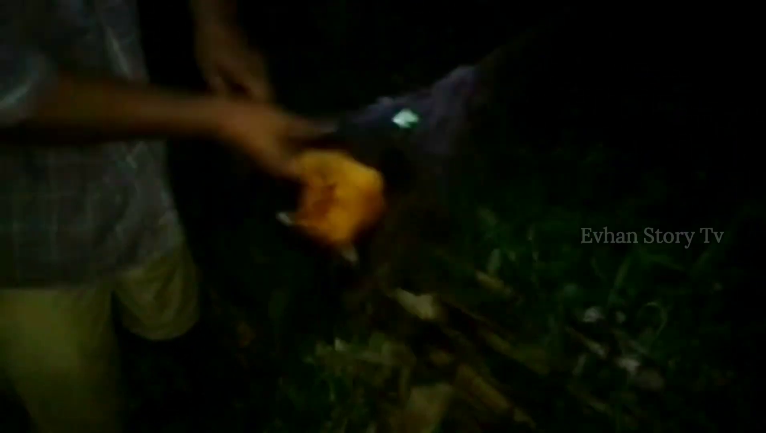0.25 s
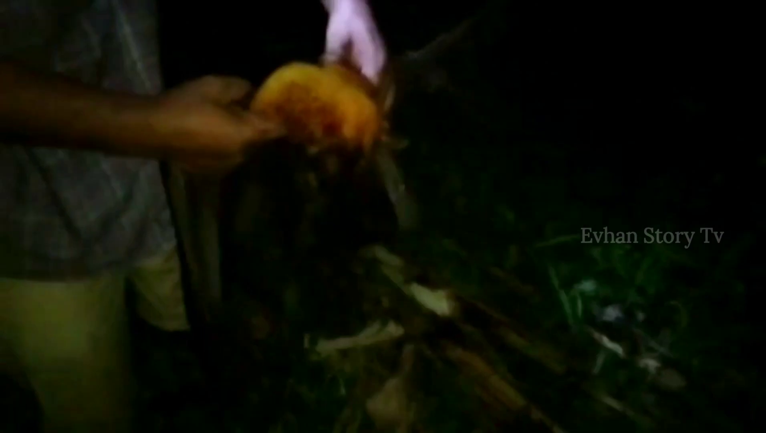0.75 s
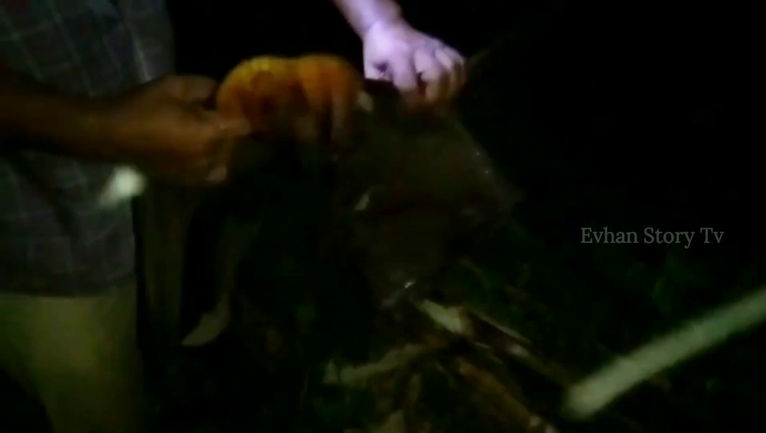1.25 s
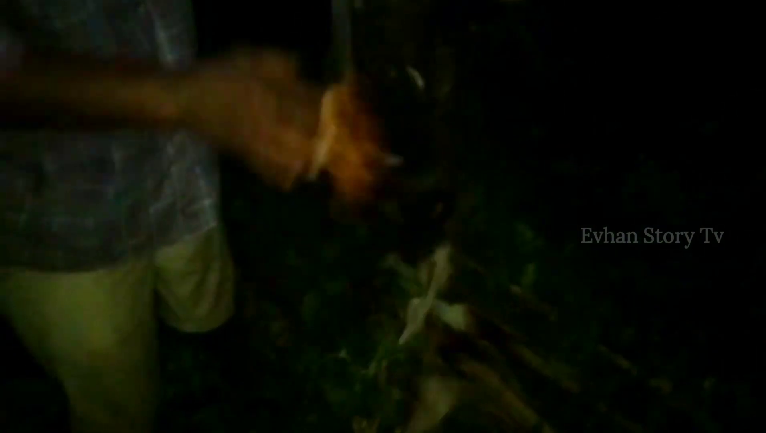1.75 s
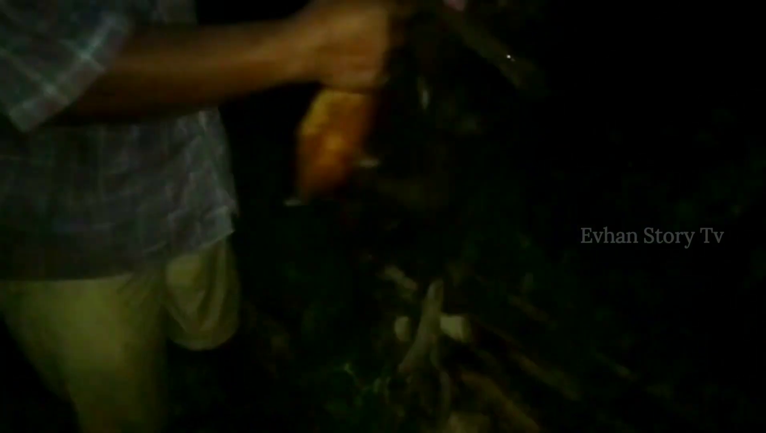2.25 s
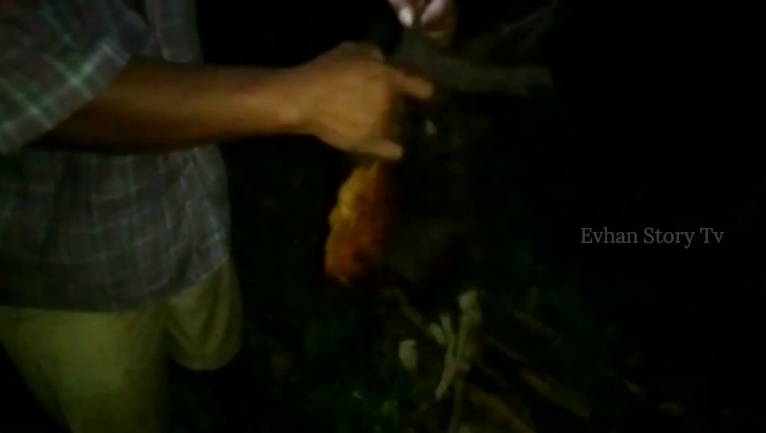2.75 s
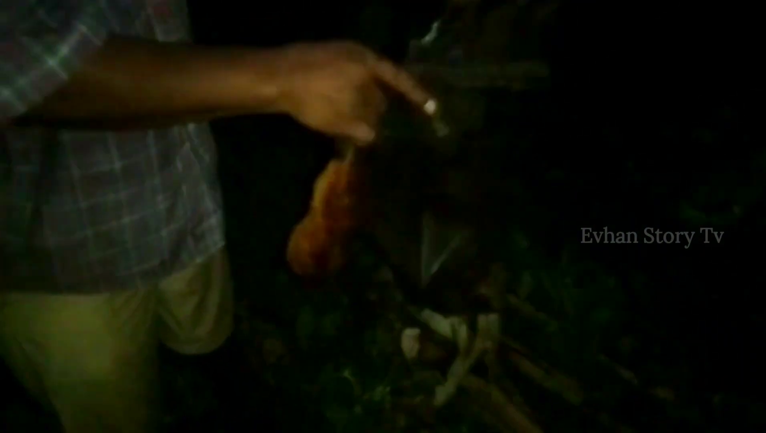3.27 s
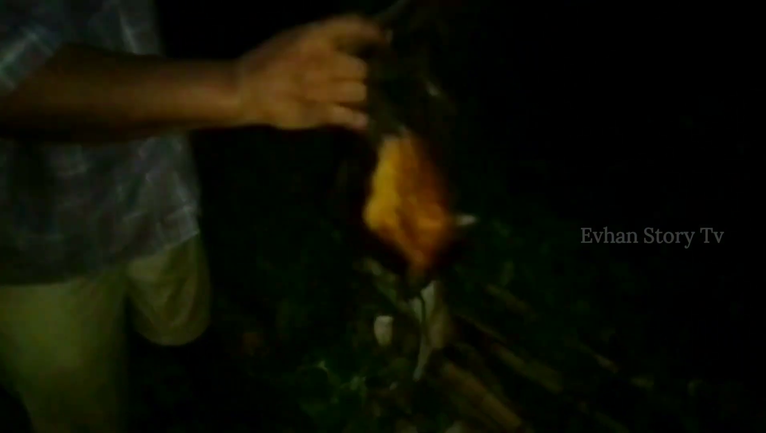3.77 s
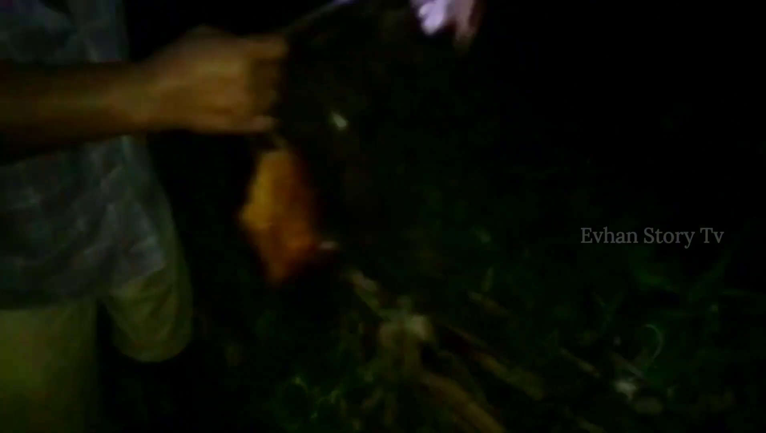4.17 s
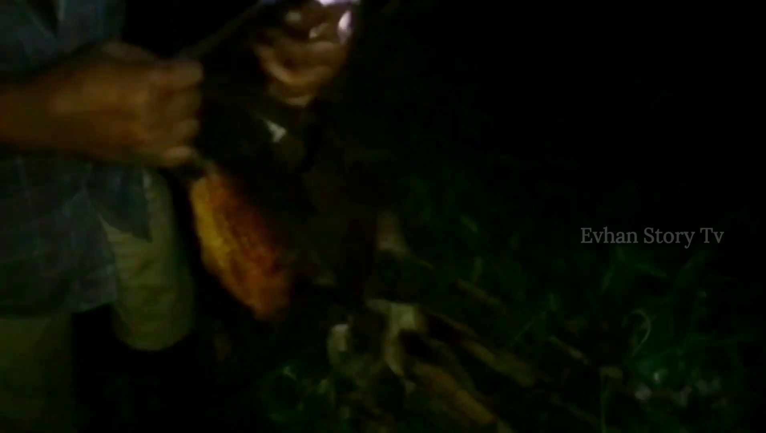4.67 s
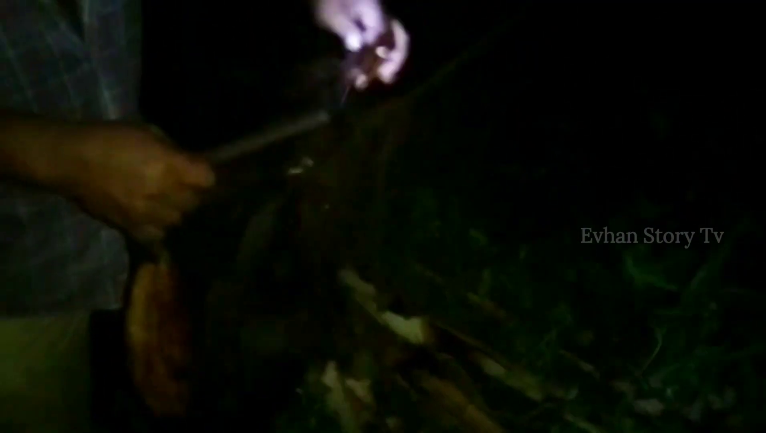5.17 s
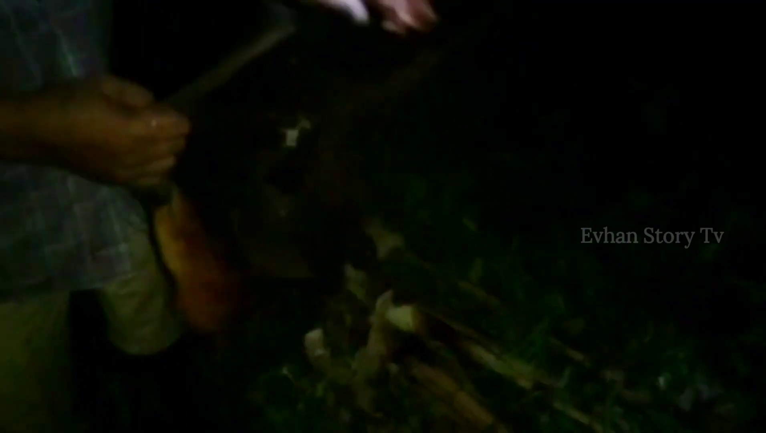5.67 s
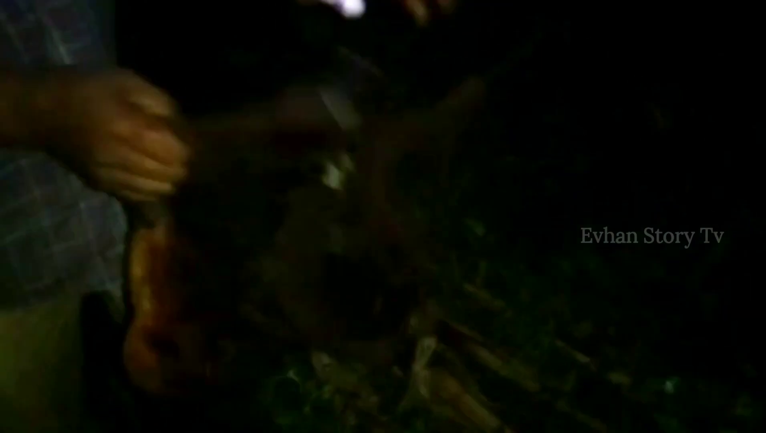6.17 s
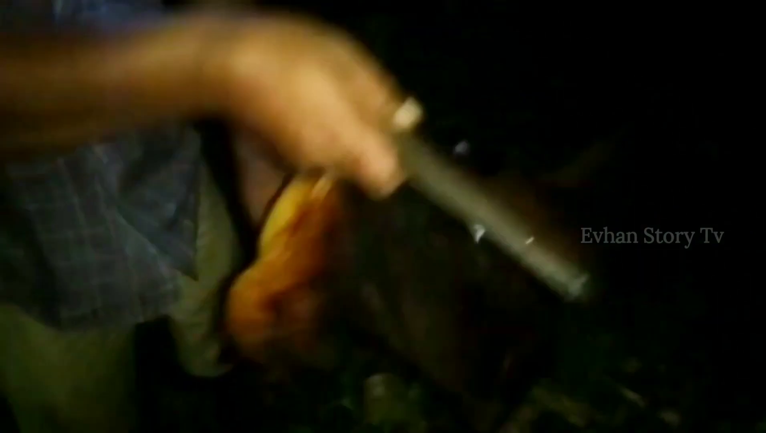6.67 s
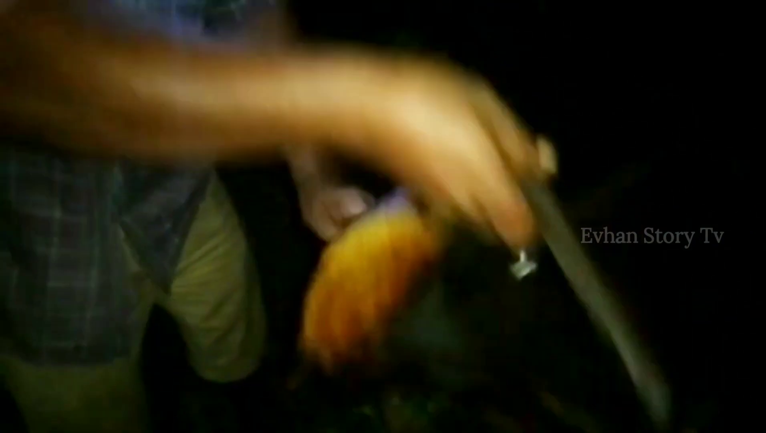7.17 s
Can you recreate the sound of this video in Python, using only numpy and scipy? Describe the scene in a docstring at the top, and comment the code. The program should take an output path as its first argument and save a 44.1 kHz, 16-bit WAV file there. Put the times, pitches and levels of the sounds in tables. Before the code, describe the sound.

A buzzing near cricket gives way to a brighter one amid a shimmering night insect chorus, while someone quietly handles a knife among twigs.

```python
"""Night undergrowth. A wide cricket chorus, a fast singer further off and a faint low rumble run throughout.
From the start a bush cricket trills close by, amid soft taps and rustles of someone handling a knife.
At 3.1 s a second, brighter one enters; the first stops by 3.7 s. Later the chorus, then the fast singer, fade.
Near wingbeats are gliding harmonic rasps plus ringing strokes near 7-8 kHz; leaves add decaying noise echoes.
The chorus is throbbing noise bands plus a few tones; rumble, taps and rustles are filtered noise."""
import sys
import numpy as np
from scipy import signal
from scipy.fft import rfft, irfft
from scipy.io import wavfile

SR = 44100
rng = np.random.default_rng(int(sys.argv[2]) if len(sys.argv) > 2 else 0)


def put_to_file(sound):
    """Save the sound as 16-bit audio at rate SR, in the file named by the first command-line argument."""
    columns = np.atleast_2d(sound).T  # one column per channel
    safe = np.clip(columns, -1, 1)
    whole_steps = np.round(safe * 32767)
    wavfile.write(sys.argv[1], SR, whole_steps.astype(np.int16))


N = 327663
TIME_S = np.arange(N) / SR


def undb(db):
    """Decibels to gain."""
    return 10 ** (np.asarray(db) / 20)


def unit(x):
    """Scale to an rms of 1."""
    return x / np.sqrt(np.mean(x ** 2))


def wander(rate_hz):
    """Smooth random curve of rms 1: white noise under a Gaussian low-pass of width rate_hz."""
    freq_hz = np.arange(N // 2 + 1) * SR / N
    lowpass = np.exp(-.5 * (freq_hz / rate_hz) ** 2)
    return unit(irfft(rfft(rng.standard_normal(N)) * lowpass, N))


def colour(x, points):
    """Shape by (freq_hz, gain_db) points; beyond the ends fall 24 dB/octave below, 12 above."""
    point_hz, point_db = np.transpose(points)
    freq_hz = np.arange(1, N // 2 + 2) * SR / N
    skirts = np.minimum(freq_hz / point_hz[0], 1) ** 4 * np.minimum(point_hz[-1] / freq_hz, 1) ** 2
    gain_db = np.interp(np.log(freq_hz), np.log(point_hz), point_db)
    return unit(irfft(rfft(x) * skirts * undb(gain_db), N))


def band(x, center_hz, octaves):
    """Butterworth band-pass around a centre."""
    edges_hz = center_hz * 2 ** (np.array([-.5, .5]) * octaves)
    edges_hz = np.minimum(edges_hz, SR / 2 - 1000)
    return signal.sosfilt(signal.butter(2, edges_hz, "band", fs=SR, output="sos"), x)


def leaves(x, wet_db, t60_s):
    """Leaves and stems send back a dense, short smear: convolution with decaying noise."""
    t_s = TIME_S[:SR // 4]
    smear = rng.standard_normal(len(t_s)) * np.exp(-np.log(1000) * t_s / t60_s)
    wet = unit(signal.fftconvolve(x, smear)[:N])
    return unit(unit(x) + undb(wet_db) * wet)


def reflect(x, delay_s, db):
    """One delayed copy by way of the ground or a nearby surface."""
    return x + undb(db) * np.interp(TIME_S - delay_s, TIME_S, x)


def swell(center_s, length_s):
    """Gaussian rise and fall; length_s is the full width at 1/e."""
    return np.exp(-(2 * (TIME_S - center_s) / length_s) ** 2)


def fade(db, start_s, db_per_s):
    """Hold a level, then sink steadily."""
    return undb(db - db_per_s * np.maximum(TIME_S - start_s, 0))


def wingbeats(rate_hz, start_turns):
    """Wing phase in turns: the integral of the beat rate."""
    return start_turns + np.cumsum(rate_hz) / SR


def stroke(turns, length, hz, glide, rough, scatter_db, count=1, edge=2, stray=.006):
    """Once a turn the scraper runs over the file: a short tone at the tooth rate with count partials."""
    beat = np.round(turns).astype(int)
    place = turns - beat  # turns from the stroke centre
    beat -= beat.min()
    size, detune = rng.standard_normal((beat.max() + 1, 2))[beat].T  # one draw per beat
    pressure = np.exp(-.5 * np.abs(place / length) ** edge) * undb(scatter_db * size)
    # rough: fast pitch jitter, uneven from tooth to tooth; stray: detuning from beat to beat
    tooth_hz = hz * (1 + glide * place + stray * detune + rough * wander(501.8))
    angle = 2 * np.pi * np.cumsum(tooth_hz) / SR
    partials = sum(np.sin(k * angle) for k in range(1, count + 1))
    return unit(pressure * partials)


# rumble spectrum: freq_hz, gain_db
AIR_SPECTRUM = [(15, -49), (25, -25), (53, -5.5), (107, 1), (261, -10.5), (323, -9), (438, -15.5),
                (697, -16.5), (864, -19), (1190, -19.5), (1800, -18), (2340, -17), (3960, -120)]


def night_air():
    """Faint low rumble of shaped noise, with a hum wavering in pitch and level."""
    rumble = colour(rng.standard_normal(N), AIR_SPECTRUM) * undb(-56.5 + 0.48 * wander(6.8))
    hum_hz = 113 + 3 * wander(3.9)
    hum = np.sin(2 * np.pi * np.cumsum(hum_hz) / SR) * undb(-69.5 + 3 * wander(3.6))
    return rumble + hum


# taps of knife and twigs: start_s, peak_db, pitch_hz, t60_s
KNIFE_TAPS = [(.085, -46, 690, 0.064), (.286, -42, 546, 0.072), (0.404, -47, 400, 0.036),
              (1.128, -46, 220, .05), (1.324, -39, 1790, 0.017), (1.47, -45, 650, .11),
              (2.468, -41, 1805, .06), (3.292, -41, 1890, .04), (5.559, -42, 740, 0.026),
              (5.589, -39.5, 1310, 0.05), (6.551, -30, 2400, 0.017), (6.721, -35.5, 520, .022),
              (7.085, -47, 1200, .03), (7.279, -48, 500, 0.061)]
# rustles: center_s, length_s, level_db, pitch_hz
HANDLING_RUSTLES = [(0.19, 0.62, -64, 550), (1.178, 0.071, -59, 1600), (1.53, 0.2, -55.5, 900),
                    (1.85, 0.68, -61, 1400), (2.341, 0.07, -53, 1800), (2.815, 0.26, -61.5, 647),
                    (4.08, 0.23, -63, 750), (4.732, 0.064, -52.5, 1400), (5.016, 0.27, -61.5, 1000)]


def handling():
    """Dull taps as decaying noise bursts; soft rustles as band noise with a fast random level."""
    out = np.zeros(N)
    t_s = TIME_S[:SR // 10]
    for start_s, peak_db, pitch_hz, t60_s in KNIFE_TAPS:
        burst = rng.standard_normal(len(t_s)) * np.exp(-np.log(1000) * t_s / t60_s)
        tap = band(burst, pitch_hz, 2.54)
        at = int(start_s * SR)
        out[at:at + len(t_s)] += undb(peak_db) * tap / np.abs(tap).max()
    for center_s, length_s, level_db, pitch_hz in HANDLING_RUSTLES:
        grains = rng.standard_normal(N) * undb(5 * wander(90))
        crackle = unit(band(grains, pitch_hz, 2.3))
        out += undb(level_db) * crackle * swell(center_s, length_s)
    return out


def far_tones(count=6):
    """A few singers that stand out of the chorus, each with its own pitch and beat."""
    voices = 0
    for hz in np.linspace(6600, 7650, count):
        turns = rng.uniform(38, 70) * TIME_S + .3 * wander(0.96) + rng.random()
        voice = stroke(turns, length=0.14, hz=hz, glide=0.012, rough=0.00795, scatter_db=-0.5)
        voices = voices + voice * undb(2 * wander(2.4))
    return leaves(voices, wet_db=1.5, t60_s=0.06)


# lag off a surface close to the microphone
NEAR_ECHO_S = .001358
CHORUS_DB, CHORUS_FADES_S, CHORUS_FADE_DB_PER_S = -24, 4.3, 0.77
# far chorus spectrum: freq_hz, gain_db
CHORUS_SPECTRUM = [(1900, -46.5), (2300, -28), (2650, -21.5), (3150, -27.5), (3600, -23.5), (4100, -25),
                   (5200, -19.5), (6100, -9.5), (6800, -2), (7500, -0.5), (8600, -13), (10300, -28.5),
                   (12000, -45), (14500, -35.5)]


def chorus(count=22):
    """Many far singers as noise bands, each with its own pitch and beat, blurred into one shrill band."""
    crowd = 0
    for hz in np.geomspace(2000, 15500, count):
        beat_hz = rng.uniform(45, 90) + 1.4 * wander(1.56)
        turns = np.cumsum(beat_hz) / SR + rng.random()
        throb_db = 2 * np.sin(2 * np.pi * turns) + 1.8 * wander(250)
        crowd = crowd + band(rng.standard_normal(N), hz, 3 / count) * undb(throb_db)
    crowd = unit(reflect(colour(crowd, CHORUS_SPECTRUM), NEAR_ECHO_S, db=-24.5))
    return (crowd + undb(-4) * far_tones()) * fade(CHORUS_DB, CHORUS_FADES_S, CHORUS_FADE_DB_PER_S)


FAST_BEAT_HZ = 59.1
FAST_DB, FAST_FADES_S, FAST_FADE_DB_PER_S = -27, 4.76, 9.5


def fast_cricket():
    """Singer deeper in the leaves: two single-tone strokes a beat, reflections almost as strong as direct."""
    turns = FAST_BEAT_HZ * TIME_S + 0.402
    closing = stroke(turns, length=0.068, hz=6810, glide=0.0078, rough=.022, scatter_db=1.5, stray=.006)
    opening = stroke(turns + 0.3, length=0.062, hz=6640, glide=0.006, rough=0.0259, scatter_db=-2.0)
    song = leaves(closing + undb(-9) * opening, wet_db=-2, t60_s=0.27)
    return song * fade(FAST_DB, FAST_FADES_S, FAST_FADE_DB_PER_S)


# leaf reflections of both near singers, relative to direct sound
NEAR_WET_DB = -10
SECOND_START_S, SECOND_BEAT_HZ = 3.08, 36.66
# one hesitation: the beat slows briefly
HESITATION_HZ, HESITATION_CENTER_S, HESITATION_LENGTH_S = 1.05, 3.964, 1.538
SECOND_RASP_DB, SECOND_RING_DB = -32, -39.5
# rasp overtone spectrum as heard, with a deep dip near 12 kHz: freq_hz, gain_db
SECOND_RASP_SPECTRUM = [(2400, -1.5), (2850, 1), (5000, 4.5), (5700, 5), (7450, 18), (8600, 15.5),
                        (10300, -3), (10900, -3.5), (12100, -43), (13400, -6), (14800, -6), (16000, -10)]
# ringing-stroke swells: center_s, length_s, level_db
SECOND_RING_SWELLS = [(3.5, .25, -37), (4.402, 0.62, -32), (5.04, 0.24, -28.5), (5.343, 0.23, -27.5),
                      (6.4, 0.58, -34)]


def second_cricket():
    """Brighter, slightly faster singer: a flatter lead into a steeply climbing rasp, then a ring."""
    rate_hz = SECOND_BEAT_HZ - HESITATION_HZ * swell(HESITATION_CENTER_S, HESITATION_LENGTH_S)
    turns = wingbeats(rate_hz, -.013)
    lead = stroke(turns - .34, length=0.13, hz=2511, glide=0.051, rough=.016, scatter_db=1.9,
                  count=6, edge=2.8)
    climb = stroke(turns - .52, length=0.1, hz=2742, glide=0.45, rough=0.0271, scatter_db=2,
                   count=6, stray=.015)
    squeak = stroke(turns - .65, length=0.11, hz=5450, glide=0.148, rough=.016, scatter_db=3)
    ring = stroke(turns - .8, length=0.083, hz=7960, glide=-0.038, rough=.013, scatter_db=2.5, stray=.009)
    rasp = colour(climb + undb(-1) * lead, SECOND_RASP_SPECTRUM)
    rasp = unit(reflect(rasp, NEAR_ECHO_S, db=-16.0)) + undb(-22) * squeak
    rasp = leaves(rasp, NEAR_WET_DB, t60_s=0.095) * undb(SECOND_RASP_DB)
    effort = undb(SECOND_RING_DB)
    for center_s, length_s, level_db in SECOND_RING_SWELLS:
        effort = effort + undb(level_db) * swell(center_s, length_s)
    ring = leaves(ring, NEAR_WET_DB, t60_s=0.062) * effort
    return (rasp + ring) * np.clip((TIME_S - SECOND_START_S) / 0.11, 0, 1)


def catch(turns, hz):
    """The wing catches on the file and rings for a few milliseconds."""
    return stroke(turns, length=0.059, hz=hz, glide=-.04, rough=.011, scatter_db=1.1, edge=2.4, stray=.004)


# narrow wing resonances: freq_hz, gain_db
WING_RESONANCES = [(6900, 1.5), (7000, -3), (7135, 0.5)]


def wing(x):
    """The wing membrane keeps sounding after a stroke: narrow resonances added to the input."""
    return x + sum(undb(gain_db) * band(x, freq_hz, 0.0082) for freq_hz, gain_db in WING_RESONANCES)


FIRST_STOP_S, FIRST_RASP_DB = 3.68, -34.5
# tiring: the beat sags ever faster towards the stop
FIRST_BEAT_HZ, TIRED_SAG_HZ, TIRING_S = 35.241, 1.234, 1.154
# rasp overtone spectrum as heard: freq_hz, gain_db
FIRST_RASP_SPECTRUM = [(2450, 0), (3000, 3.5), (4800, -2.5), (5400, -3.5), (7400, 10), (8300, -1.5),
                       (9900, -5), (10800, -11.5), (12000, -18), (13000, -30), (15300, -27)]
# catches in every beat: place_turns, pitch_hz, level_db
STEADY_CATCHES = [(.81, 6910, -27), (1.15, 6996, -30)]
# catches while it presses harder: center_s, length_s, level_db, place_turns, pitch_hz
SWELLING_CATCHES = [(.4, 0.35, -27.5, 0.82, 6930), (1.0, 1.1, -27, 1.135, 6990),
                    (1.4, 2.2, -27, 1.235, 7350), (1.74, 0.71, -23, .92, 7037),
                    (2.91, 0.84, -20, 0.787, 6895), (3.15, 0.74, -26, 1.06, 7150),
                    (3.5, 0.39, -23, 0.743, 6945)]


def first_cricket():
    """Nearest singer: a rasp, then ringing catches of the wing, 35 times a second until it tires and stops."""
    rate_hz = FIRST_BEAT_HZ - TIRED_SAG_HZ * np.exp(np.minimum(TIME_S - FIRST_STOP_S, 0) / TIRING_S)
    turns = wingbeats(rate_hz, .329)
    rasp = stroke(turns - .46, length=0.09, hz=2555, glide=0.22, rough=0.02716, scatter_db=1.4,
                  count=6, edge=4.1, stray=.012)
    scrape = stroke(turns - .48, length=0.15, hz=3593, glide=0.025, rough=0.05, scatter_db=3.5, edge=4.5)
    # squeak as the scraper leaves the file
    squeak = stroke(turns - .6, length=0.047, hz=5320, glide=.1, rough=0.0201, scatter_db=1.5, stray=.015)
    rasp = reflect(colour(rasp, FIRST_RASP_SPECTRUM), delay_s=.0074, db=-12)
    rasp = rasp + undb(-18) * scrape + undb(-11) * squeak
    rasp = leaves(rasp, NEAR_WET_DB, t60_s=0.12) * undb(FIRST_RASP_DB)
    ring = 0
    for place_turns, pitch_hz, level_db in STEADY_CATCHES:
        ring = ring + undb(level_db) * catch(turns - place_turns, pitch_hz)
    for center_s, length_s, level_db, place_turns, pitch_hz in SWELLING_CATCHES:
        effort = undb(level_db) * swell(center_s, length_s)
        ring = ring + effort * catch(turns - place_turns, pitch_hz)
    # resonances and leaves leave the overall ring level unchanged
    ring = leaves(wing(ring), NEAR_WET_DB, t60_s=0.1) * np.std(ring)
    return (rasp + ring) * np.clip((FIRST_STOP_S - TIME_S) / 0.055, 0, 1)


def scene():
    """All the singers and small sounds at one microphone."""
    background = night_air() + handling() + chorus() + fast_cricket()
    return (background + second_cricket() + first_cricket())[None]


TOP_HZ = 15500


def record(dry):
    """Steep elliptic low-pass at TOP_HZ."""
    return signal.sosfilt(signal.ellip(10, .2, 80, TOP_HZ, fs=SR, output="sos"), dry)


dry = scene()
out = record(dry)
put_to_file(out)
```